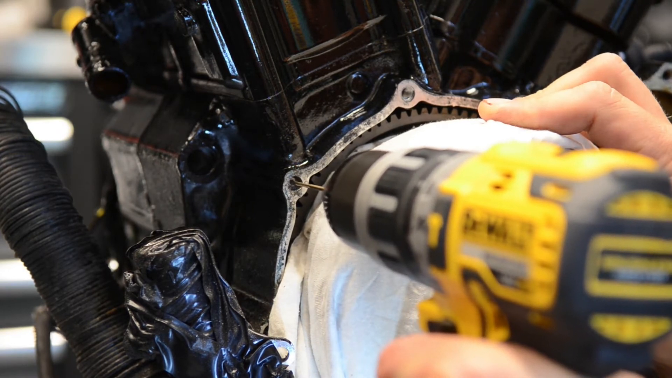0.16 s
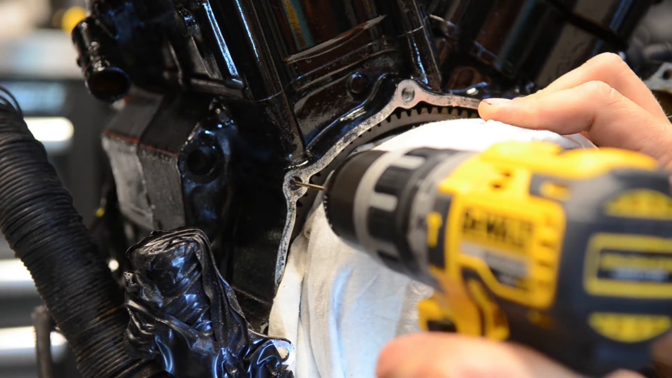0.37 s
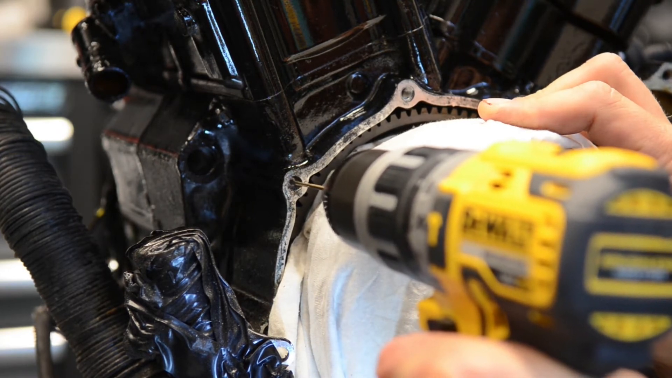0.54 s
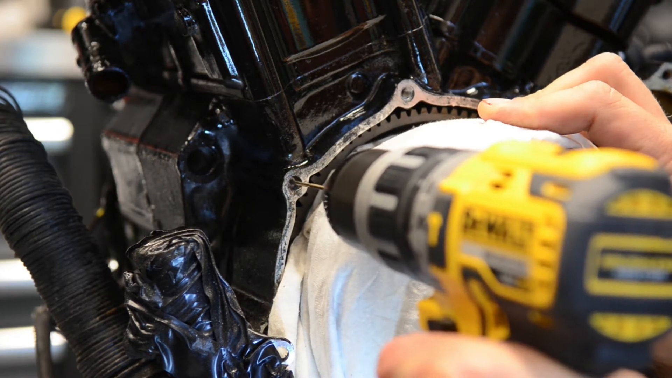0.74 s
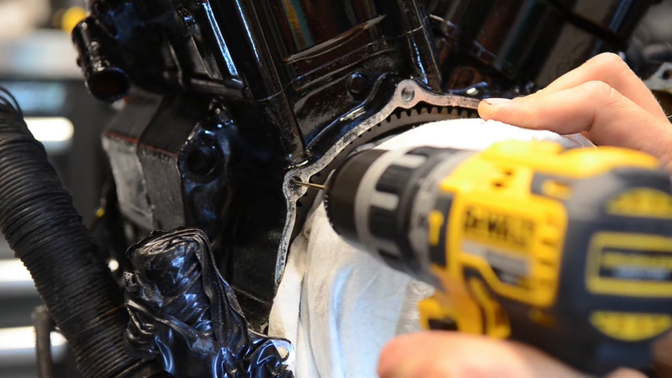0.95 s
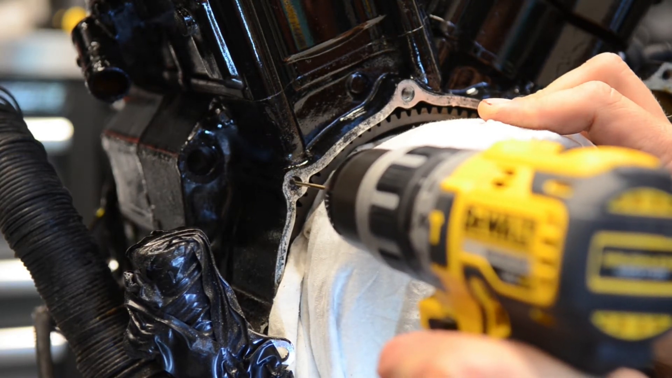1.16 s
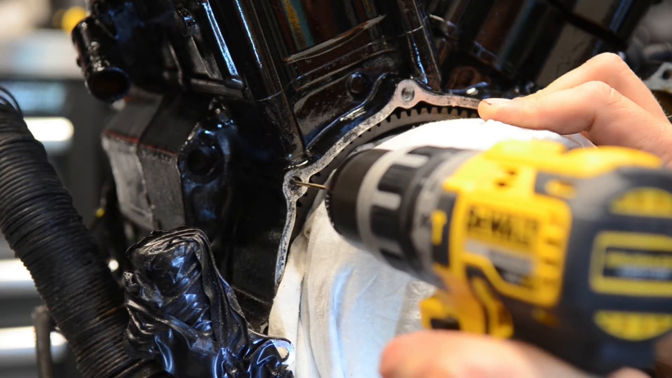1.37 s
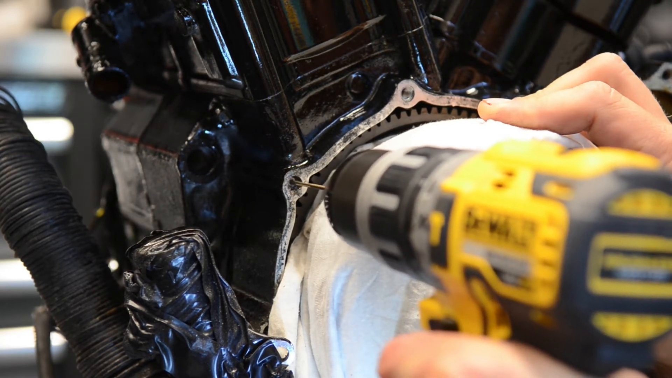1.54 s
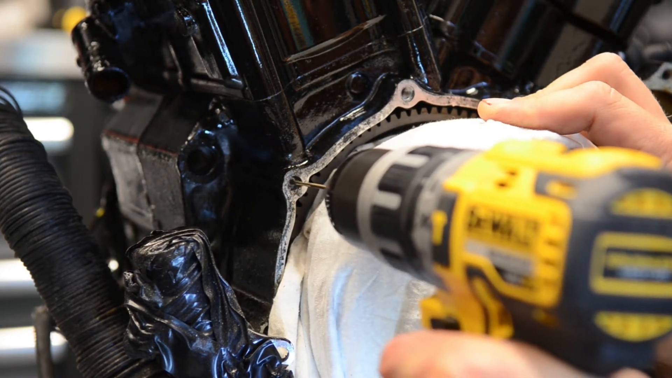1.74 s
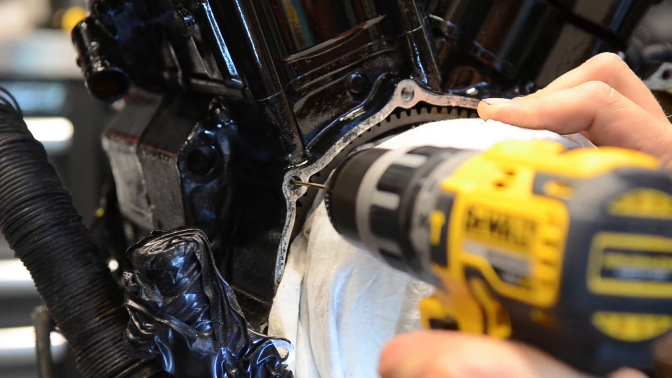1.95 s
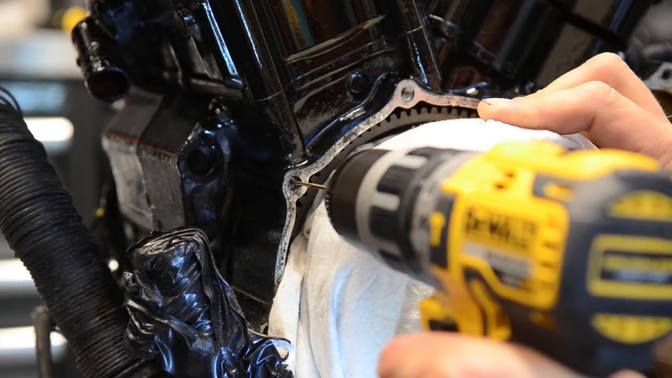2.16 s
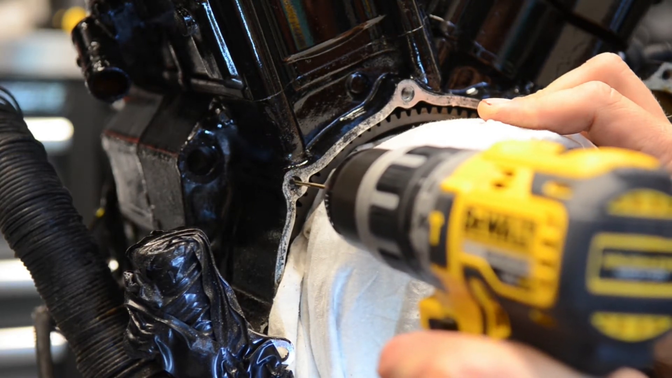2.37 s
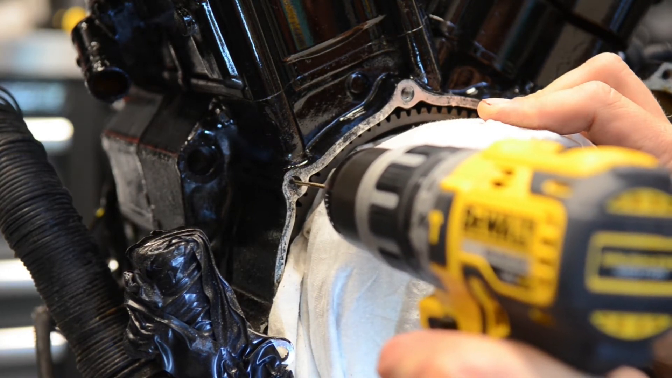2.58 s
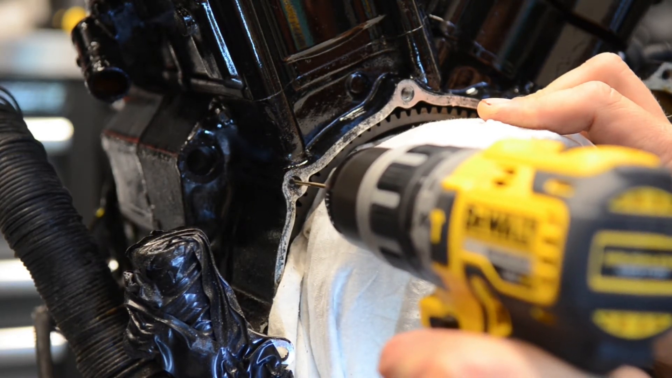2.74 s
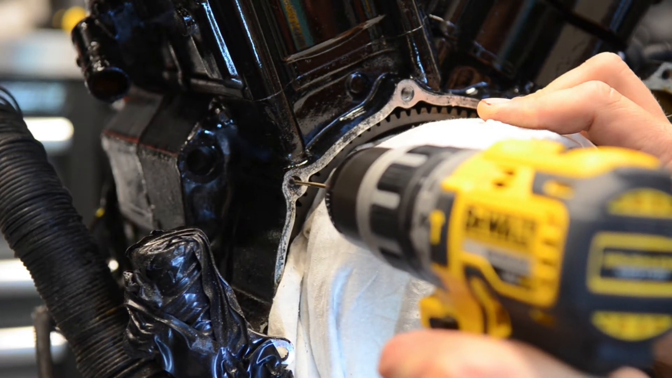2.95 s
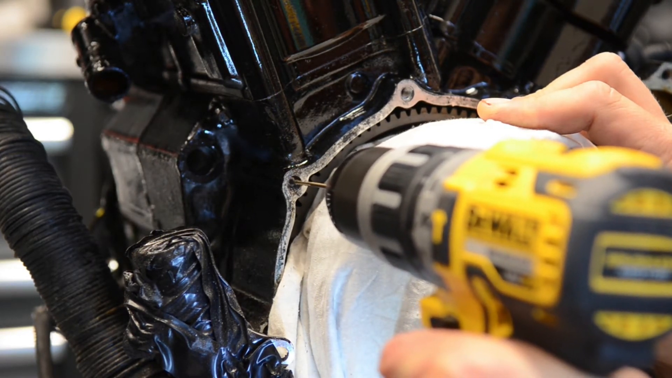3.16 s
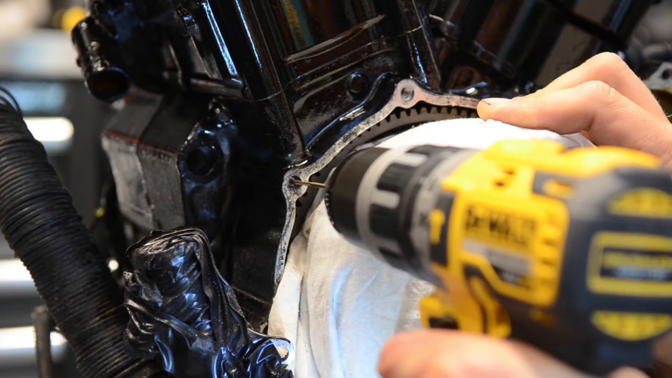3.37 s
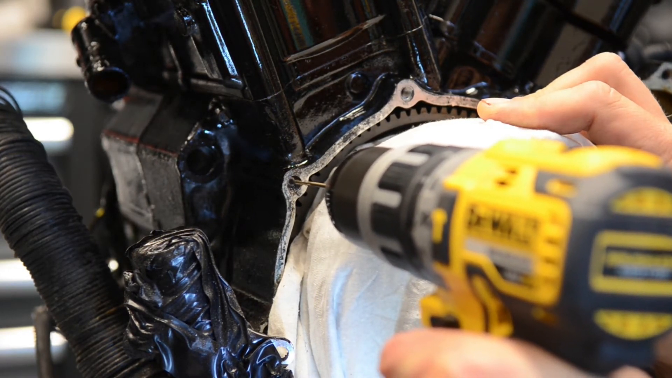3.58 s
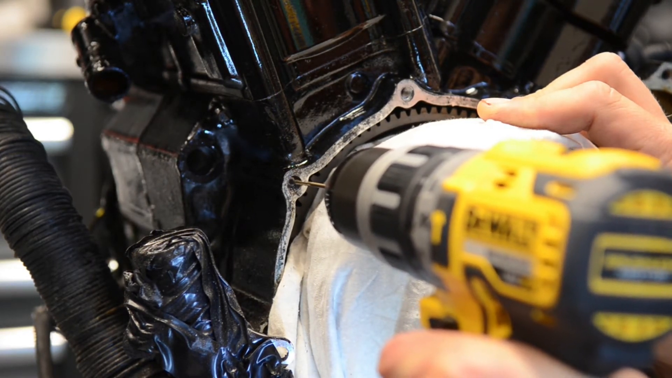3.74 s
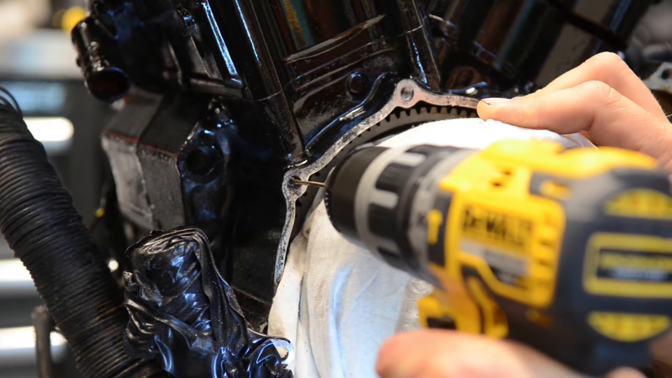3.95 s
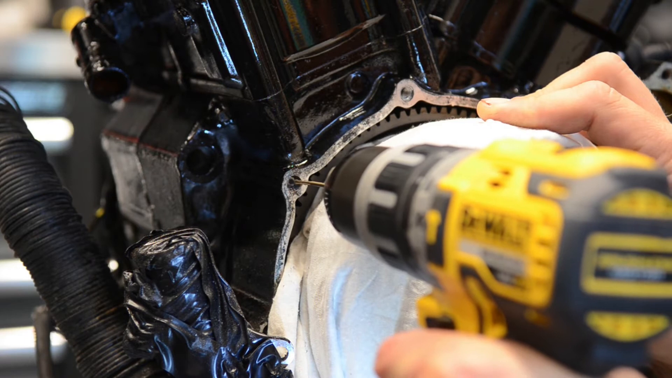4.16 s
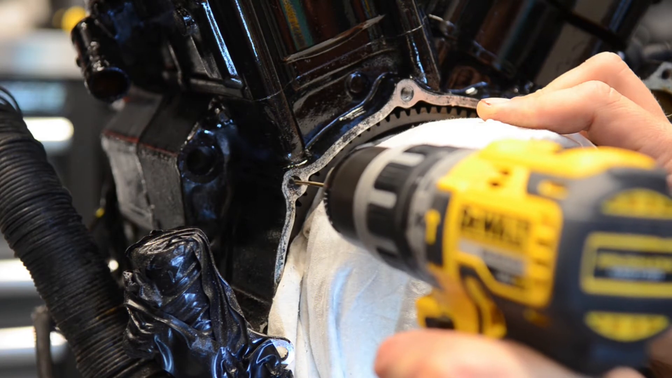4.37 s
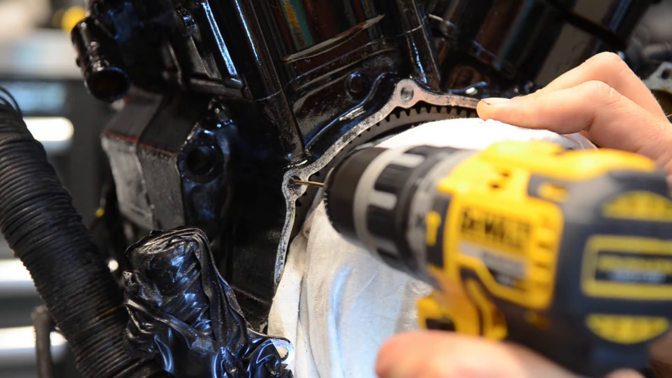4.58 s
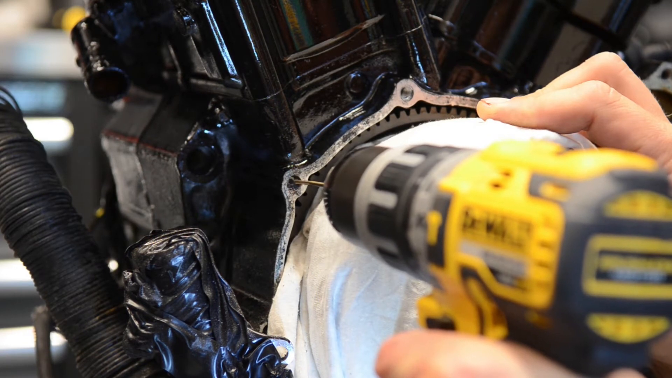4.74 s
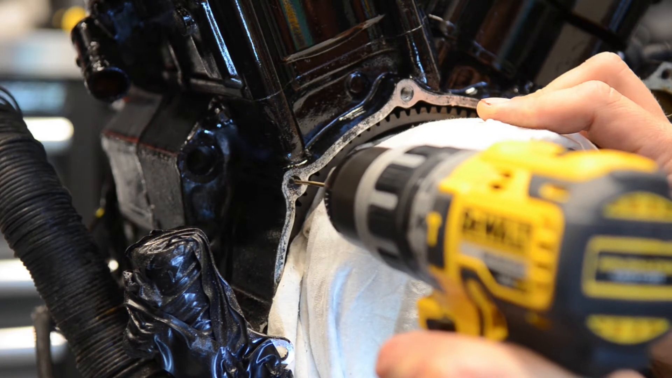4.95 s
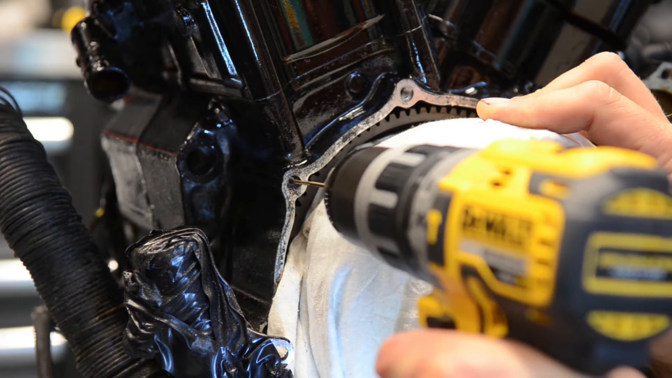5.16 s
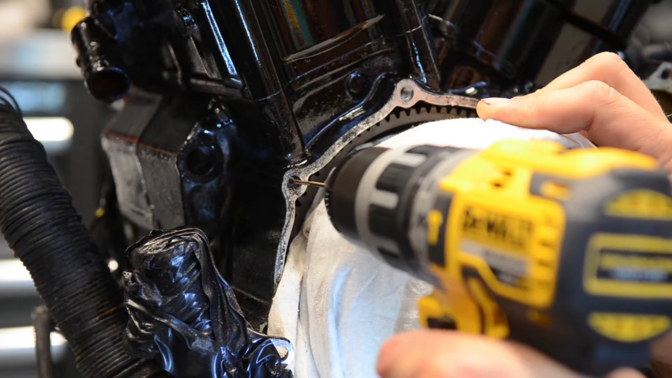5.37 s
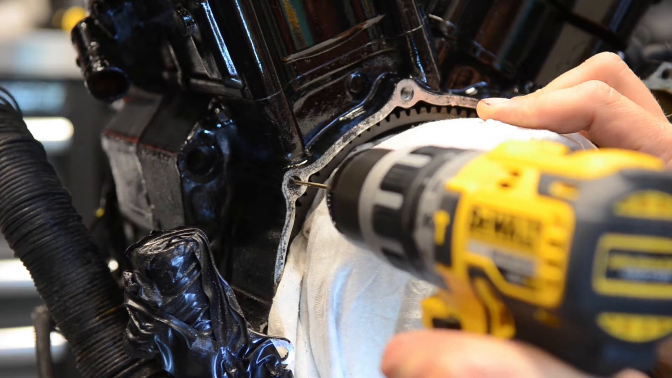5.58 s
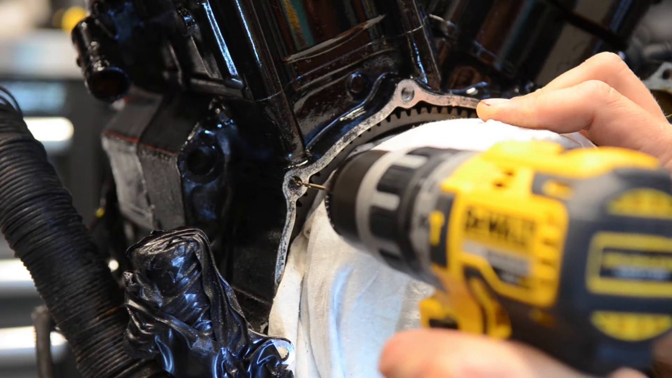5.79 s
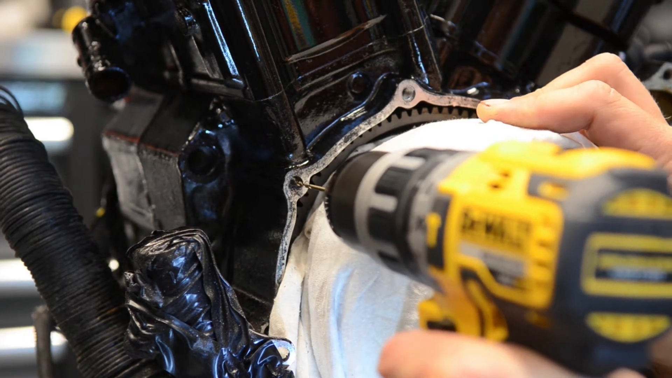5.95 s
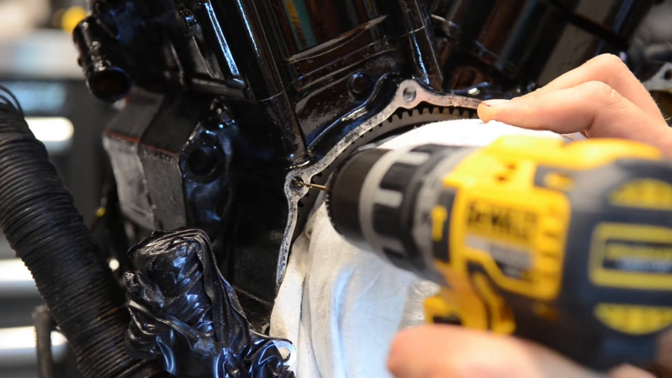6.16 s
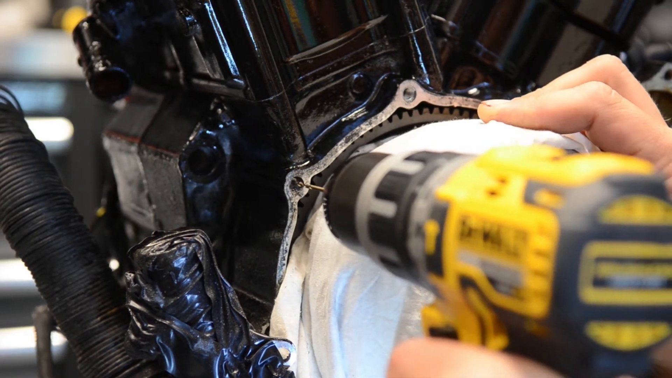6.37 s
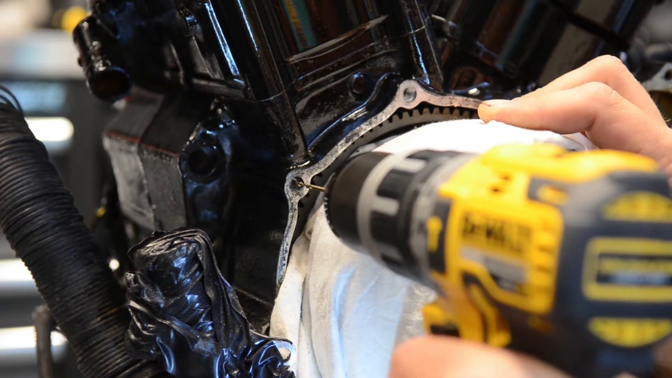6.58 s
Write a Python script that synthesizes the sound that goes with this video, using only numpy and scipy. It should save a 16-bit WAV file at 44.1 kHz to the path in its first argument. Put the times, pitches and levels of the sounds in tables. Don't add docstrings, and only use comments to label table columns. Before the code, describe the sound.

A cordless drill works in a metal casting, heard close and centred in a lightly reverberant workshop, with far traffic rumbling faintly beneath. From 0 s it is already running at double speed: a shrill, piercing whine of stacked motor tones near 3.7 kHz and above, over dense gritty gear and bit rattle. Around 0.3-0.6 s the pitch sags in short bites; from 0.7 to 1.1 s it runs free, racing higher with chattering gears, then settles. Small dips and chopped flutters come near 2.1 and 2.5 s, followed by a steady, slightly wavering whine. At 5.03 s all pitches suddenly drop an octave to natural pace. At 5.44 s the trigger is released: the whine breaks and slides down quickly, with brake rub and small knocks, ending in a sharp double clunk at 5.67 s. A brief ring and echo fade, leaving low distant road hum until about 6.6 s.

```python
import sys
import numpy as np
from scipy import signal
from scipy.fft import rfft, irfft, next_fast_len
from scipy.io import wavfile
from scipy.ndimage import uniform_filter1d

SR = 44100
rng = np.random.default_rng(int(sys.argv[2]) if len(sys.argv) > 2 else 0)


def level_to_linear(level):
    exponent = np.asarray(level, float) / 20
    return 10 ** exponent


def waveform_to_disk(signal):
    frames = np.transpose(np.atleast_2d(signal))
    scaled = np.clip(frames, -1, 1) * 32767
    samples = np.round(scaled).astype(np.int16)
    wavfile.write(sys.argv[1], SR, samples)


N = 291942

CUT_S = 5.0305
CUT = round(CUT_S * SR)
LONG = N + CUT
BRAKE_S, LOCK_S = 5.438, 5.67

# f/Hz, width/Hz, lift/dB
HOUSING_MODES = [(412, 150, -1.5), (758, 180, 9), (1017, 135, 5), (1408, 240, 7), (1720, 580, 2),
                 (2614, 380, -6.5), (3160, 130, -2.5), (4230, 830, 4), (5580, 1900, -9), (7040, 280, 4.5)]


def rms_one(x):
    return x / np.sqrt(np.mean(x ** 2) + 1e-20)


def clock():
    t = np.arange(LONG) / SR
    return np.where(t < 2 * CUT_S, t / 2, t - CUT_S)


def drift(rate_hz):
    knots = rng.standard_normal(int(LONG / SR * 60) + 4)
    at = np.arange(0, LONG, 8) / SR * min(rate_hz, 60)
    coarse = np.interp(at, np.arange(len(knots)), knots)
    return np.repeat(coarse, 8)[:LONG]


def spans(rows, lag_s):
    t = clock()
    held = np.full((len(rows[0]) - 2, LONG), 1e-18)
    for row in rows:
        start, end = np.searchsorted(t, row[:2])
        held[:, start:end] += np.array(row[2:])[:, None]
    r = np.exp(-1 / (lag_s * SR))
    return signal.lfilter([1 - r], [1, -r], held)


def colour(x, spectrum, peaks=()):
    size = next_fast_len(len(x))
    hz = np.arange(1, size // 2 + 2) * SR / size
    knot_hz, knot_db = np.transpose(spectrum)
    db = np.interp(np.log(hz), np.log(knot_hz), knot_db)
    for centre_hz, width_hz, lift_db in peaks:
        db += lift_db / (1 + (2 * (hz - centre_hz) / width_hz) ** 2)
    return irfft(rfft(x, size) * level_to_linear(db), size)[:len(x)]


def band(x, hz, kind):
    return signal.sosfilt(signal.butter(4, hz, kind, fs=SR, output="sos"), x)


def resonate(x, hz, width_hz):
    return signal.lfilter(*signal.iirpeak(hz, hz / width_hz, SR), x)


def rotor():
    # t/s, speed/(turns per s)
    governed = [(0, 154.4), (.21, 154.8), (.5, 154.2), (1.1, 154.6), (1.31, 155.4), (1.5, 155.4),
                (1.772, 153.7), (1.988, 155), (2.04, 153.6), (2.116, 154.4), (2.232, 154.3), (2.328, 153.4),
                (2.484, 154.3), (2.82, 155.4), (3.096, 154.5), (3.404, 155.1), (5.03, 154.8), (5.44, 154.8)]
    # start/s, end/s, target against governed/(turns per s)
    loads = [
        (.32, .421, -12),
        (.345, .421, -7),
        (.584, .613, -19),
        (.64, .69, -2.0),
        (.692, 1.116, 17.8),
        (1.152, 1.176, -12),
        (2.125, 2.145, -9),
        (2.505, 2.533, -16.5),
        (2.582, 2.604, -4),
    ]
    rotor_lag_s, grip_s = .046, .014
    brake_turns_per_s2, brake_lag_s = 420, .02
    load = uniform_filter1d(spans(loads, rotor_lag_s)[0], size=round(grip_s * SR))
    age_s = np.clip(clock() - BRAKE_S, 0, LOCK_S - BRAKE_S)
    lost = brake_turns_per_s2 * (age_s - brake_lag_s * (1 - np.exp(-age_s / brake_lag_s)))
    speed = np.interp(clock(), *np.transpose(governed)) + load - lost
    racing = np.interp(speed, [158, 170], [0, 1])
    return speed, load, racing


def whine(turn, orders, level_db, waver_db):
    out = 0
    for k, db in orders:
        coarse = level_to_linear((level_db + db + waver_db * drift(14))[::8])
        gain = np.repeat(coarse, 8)[:LONG]
        out = out + gain * np.sin(k * turn + rng.uniform(0, 2 * np.pi))
    return np.sqrt(2) * out


def motor(speed, load, racing):
    # multiple of rotor speed, level/dB against their whine
    slot_orders = [(1, -34.5), (2, -29.5), (3, -23), (4, -21.5), (6, -18), (10, -36), (11, -18), (12, 2.0),
                   (13, -36)]
    magnet_order = [(16, 0)]
    fan_orders = [(20, -7), (22, -4.5), (23, -2), (24, -25)]
    brush_orders = [(26, -4), (27, -17), (28, 0), (29, -27), (32, -17), (40, -33)]
    planet_orders = [(30.89, -14), (32.11, -14), (32.88, -15)]
    # multiple, level/dB, mode f/Hz, width/Hz, lift/dB
    gear_orders = [(8, -67, 1345, 270, 22.5), (16.75, -72, 2880, 300, 16), (3, -75, 516, 60, 15),
                   (22, -83, 3780, 350, 23)]
    # start/s, end/s, lift/dB
    sings = [(0, .05, 7), (.28, .37, 8), (.435, .585, 7), (.61, .71, 7), (.78, .9, .5), (.95, 1.1, 2.5),
             (1.1, 1.2, 5), (1.2, 1.58, 9.5), (1.61, 1.76, 10.5), (1.81, 2.01, 6), (2.05, 2.19, 8.5),
             (2.21, 2.28, 9), (2.3, 2.4, 2), (2.42, 2.62, 9), (2.64, 2.72, 9.5), (2.75, 2.87, 11),
             (2.9, 3.38, 3), (3.4, 3.76, 5), (3.78, 3.9, 3), (3.95, 4.15, 3), (4.22, 4.48, 4.5),
             (4.51, 4.66, 6.5), (4.71, 4.78, 9), (4.8, 5.03, 2.5), (5.11, 5.2, 4), (5.24, 5.33, 4)]
    # start/s, end/s, magnet lift/dB, slot change/dB
    wobbles = [(.365, .395, 18, -5), (.42, .435, 12, -1.5), (.45, .59, 11, -3.5), (.635, .7, 11, -13),
               (.72, .89, 11, -1), (.89, .94, 6, -7), (.94, 1.05, 11, 0.5), (1.05, 1.16, 5, -6),
               (1.18, 1.23, .1, -6), (1.74, 1.82, 13, -5.5), (2.02, 2.06, 6, -8), (2.13, 2.19, 16, -11),
               (2.22, 2.36, 11.5, -6.5), (2.36, 2.44, 11, -5.5), (2.44, 2.5, 11, -1.5),
               (2.505, 2.52, .1, -6), (2.55, 2.63, 3, -11), (4.74, 4.82, 8, -1)]
    swell_s = .012
    sag = np.maximum(-load, 0)
    gained = np.maximum(np.gradient(load) * SR * (load < 0), 0)
    pickup = uniform_filter1d(gained, size=1500)
    sing_db, = spans(sings, swell_s)
    magnet_db, falter_db = spans(wobbles, swell_s)

    age_s = clock() - BRAKE_S
    brake_db = -22 * np.exp(-(age_s / .022) ** 2 * 8.8) - 53 * np.maximum(age_s, 0)

    slot_db = -39.4 - 7.5 * racing - .012 * pickup + 0.1163 * sag
    slot_db += falter_db * (1 + .45 * drift(45)) + brake_db
    slot_db += 4.5 * (age_s > .02) * drift(45)
    fan_db = -57 + 3.5 * racing - .5 * sag + 0.54 * sing_db + 1.5 * brake_db
    fan_db -= 5 * (clock() > CUT_S)
    brush_db = -56 + sing_db + 1.5 * brake_db

    turn = 2 * np.pi * np.cumsum(speed * (1 + .0003 * drift(30))) / SR
    tones = whine(turn, magnet_order, -62.5 + magnet_db + brake_db, waver_db=3.0)
    for k, db in slot_orders:
        tones += whine(turn, [(k, db)], slot_db, waver_db=0.9 if k == 12 else 1.6)
    tones += whine(turn, fan_orders, fan_db, waver_db=2.5)
    tones += whine(turn, planet_orders, brush_db, waver_db=3.5)
    tilted = [(k, db + .3 * sag * min(2 * (k - 28), 2.5)) for k, db in brush_orders]
    tones += whine(turn, tilted, brush_db, waver_db=1.8)
    for k, db, mode_hz, width_hz, lift_db in gear_orders:
        lift = lift_db / (1 + (2 * (k * speed - mode_hz) / width_hz) ** 4)
        tones += whine(turn, [(k, db - 1)], lift + 2.5 * drift(50), waver_db=2.0)
    running = np.interp(clock(), [5.55, 5.59], [1, 0])
    return turn, running * tones


def rattle(turn, racing):
    # f/Hz, level/(dB per Hz)
    spectrum = [(35, -32), (60, -45), (98, -31), (352, -24), (455, -15), (660, -21.5), (980, -10),
                (1560, -13.5), (1840, -5.5), (2060, -11), (4150, -22), (5610, -21), (8530, -22),
                (9810, -33.5), (15600, -43)]
    parts = [
        (-42, 1.7, -41.5, -106),
        (-47.5, 0, -22, -190),
        (-51, 1.5, -37, -200),
    ]
    bite_s = 5.475
    braked_s = np.clip(clock(), bite_s, LOCK_S) - bite_s
    stopped_s = np.maximum(clock() - LOCK_S, 0)
    contacts = rng.standard_normal(LONG) * (1 + .15 * np.cos(turn))
    rung = colour(contacts, spectrum, HOUSING_MODES)
    # f/Hz, filter, trim/dB, waver/dB, waver rate/Hz
    bands = [(2600, "low", 3.0, 0.11, 9), ([2600, 5300], "band", 2.5, .5, 4.8), (5300, "high", -1.7, .4, 7)]
    out = np.zeros(LONG)
    for (db, lift, fall, die), (hz, kind, trim_db, waver_db, rate_hz) in zip(parts, bands):
        level_db = db + lift * racing + fall * braked_s + die * stopped_s
        level_db = level_db + trim_db + waver_db * drift(rate_hz)
        out += level_to_linear(level_db) * rms_one(band(rung, hz, kind))
    dying_db = np.interp(np.arange(LONG) / SR - CUT_S, [5.84, 6.0], [0, -40])
    return level_to_linear(dying_db) * out


def room(x):
    t60_s = 0.36
    age_s = np.arange(round(.6 * SR)) / SR
    white = rng.standard_normal(len(age_s)) * (age_s > .003)
    low = band(white, 5000, "low")
    tail = low * level_to_linear(-60 * age_s / t60_s) + (white - low) * level_to_linear(-60 * age_s / (0.79 * t60_s))
    return signal.fftconvolve(x, tail / np.sqrt(np.sum(tail ** 2)))[:len(x)]


def traffic():
    # t/s, f/Hz, level/dB
    engine_path = [(0, 59.9, -77.5), (.85, 58, -76), (1.1, 55.1, -79), (1.5, 66, -82), (2.2, 62, -74),
                   (2.4, 67.5, -71.5), (2.75, 65.1, -80.5), (3.3, 59.1, -77), (3.5, 58.8, -89),
                   (3.95, 57, -68), (5.021, 56, -77), (5.04, 95, -68), (5.43, 93.2, -72), (5.71, 94.8, -61),
                   (6.0, 95.6, -73), (6.16, 95.3, -80), (6.27, 93, -63), (6.62, 93.6, -67)]
    # t/s as heard, level/dB
    idler_path = [
        (0, -90),
        (.4, -78),
        (.9, -75),
        (1.4, -84),
        (1.6, -100),
    ]
    # f/Hz, level/(dB per Hz)
    roar_spectrum = [(15, -47), (25, -18), (64, -13.5), (96, -4.5), (119, -1), (199, -1.5), (290, -5.5),
                     (412, -0.5), (497, -2.5), (617, -9), (706, -1), (924, 2), (1000, 3), (1240, -2.5),
                     (15600, -54.5)]
    # f/Hz, width/Hz, lift/dB
    tyre_peak = [(980, 130, 2)]
    idler_hz, roar_db, hiss_db = 37.7, -54.66, -81.5
    s, *columns = np.transpose(engine_path)
    hz, db = (np.interp(clock(), s, column) for column in columns)
    half_db = np.where(clock() < CUT_S, -24, -9)
    angle = 2 * np.pi * np.cumsum(hz * (1 + 0.011 * drift(4.2))) / SR
    notes = np.sin(angle) + level_to_linear(half_db) * np.sin(angle / 2)
    engine = np.sqrt(2) * level_to_linear(db + 1.8 * drift(5)) * notes
    t = np.arange(LONG) / SR
    idler_db = np.interp(t / 2, *np.transpose(idler_path)) + 2.5 * drift(5.7)
    idler = level_to_linear(idler_db) * np.sin(2 * np.pi * idler_hz * t)
    roar = rms_one(colour(rng.standard_normal(LONG), roar_spectrum, tyre_peak))
    hiss = signal.lfilter([1], [1, -.3], rng.standard_normal(LONG))
    return level_to_linear(roar_db + 1.0 * drift(2.5)) * roar + engine + idler + level_to_linear(hiss_db) * hiss


def chatter(racing):
    # f/Hz, width/Hz, level/dB
    case_modes = [(1795, 380, -48), (2920, 420, -49)]
    white = rng.standard_normal(LONG) * level_to_linear(3.1 * drift(41.0))
    rung = np.zeros(LONG)
    for hz, width_hz, db in case_modes:
        rung += level_to_linear(db) * rms_one(band(white, [hz - width_hz / 2, hz + width_hz / 2], "band"))
    return racing * rung


def rub():
    # t/s, level/dB
    path = [(5.42, -66), (5.445, -47), (5.52, -52), (5.6, -47), (5.65, -62), (5.67, -44.5), (5.71, -54),
            (5.78, -68), (5.88, -89)]
    # f/Hz, width/Hz, level/dB
    chuck_modes = [(4070, 160, 4), (4250, 180, -9), (3500, 200, -5)]
    level_db = np.interp(np.arange(LONG) / SR - CUT_S, *np.transpose(path), left=-120, right=-120)
    white = rng.standard_normal(LONG)
    rung = sum(level_to_linear(db) * resonate(white, hz, width_hz) for hz, width_hz, db in chuck_modes)
    return level_to_linear(level_db + 2.1 * drift(50)) * rms_one(band(rung, [3000, 5000], "band"))


def knocks():
    # t/s, peak level/dB
    hits = [
        (5.45, -34),
        (5.473, -33),
        (5.527, -32),
        (5.596, -31),
        (5.660, -22.5),
        (5.676, -28),
    ]
    out = np.zeros(LONG)
    age_s = np.arange(4000) / SR
    for s, db in hits:
        burst = rng.standard_normal(4000) * (age_s / .002) * np.exp(-age_s / .003)
        rung = sum(resonate(burst, hz, width_hz) for hz, width_hz, _ in HOUSING_MODES)
        thud = signal.lfilter(*signal.iirpeak(480, 9, SR), burst)
        rung = band(rung + level_to_linear(9) * thud, 3800, "low")
        at = CUT + round(s * SR)
        out[at:at + 4000] += level_to_linear(db - 7.5) * rung / np.abs(rung).max()
    return out


def scene():
    speed, load, racing = rotor()
    turn, tones = motor(speed, load, racing)
    noisy = rattle(turn, racing) + rub() + knocks()
    wet = room(noisy + level_to_linear(-14) * tones)
    heard = tones + noisy + level_to_linear(-7.5) * wet + traffic() + chatter(racing)
    fast = signal.resample_poly(heard[:2 * CUT], 1, 2)
    return np.tile(np.concatenate([fast, heard[2 * CUT:]]), (2, 1))


def low_pass(x):
    return signal.sosfilt(signal.butter(12, 15780, fs=SR, output="sos"), x)


def record(dry):
    mix = dry + 0.00064
    return low_pass(mix)


dry = scene()
out = record(dry)
waveform_to_disk(out)
```